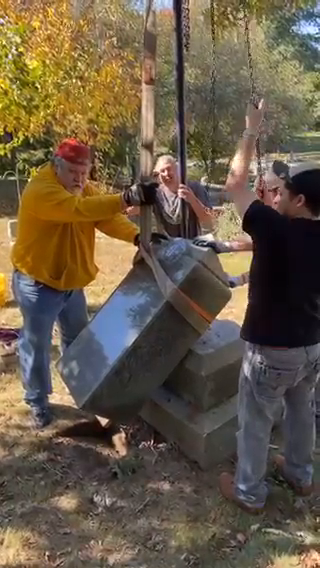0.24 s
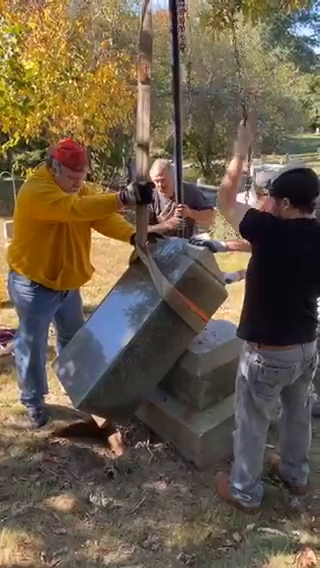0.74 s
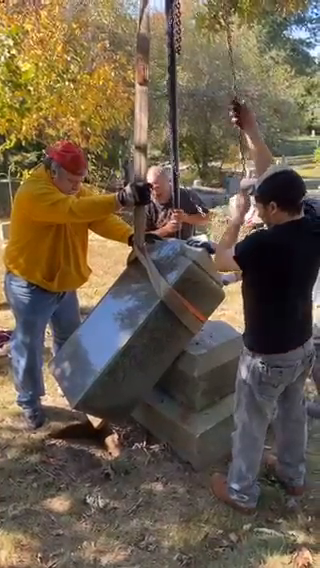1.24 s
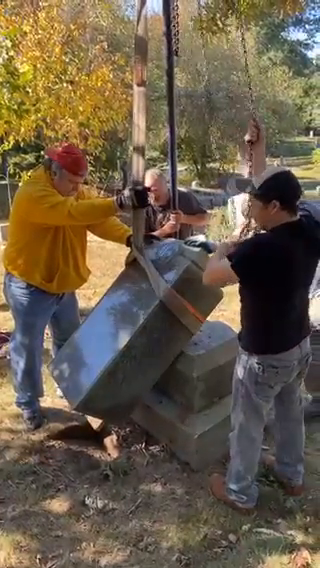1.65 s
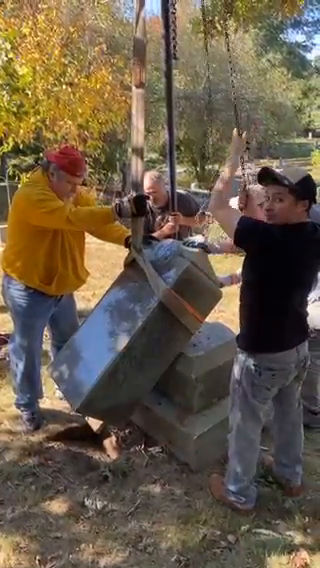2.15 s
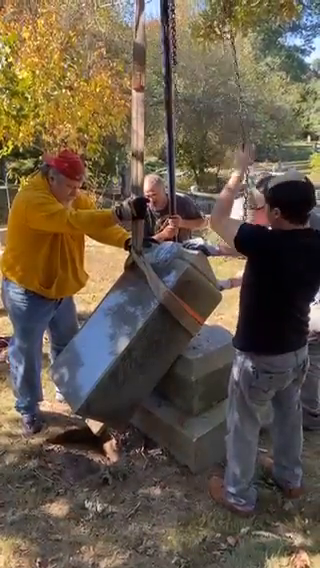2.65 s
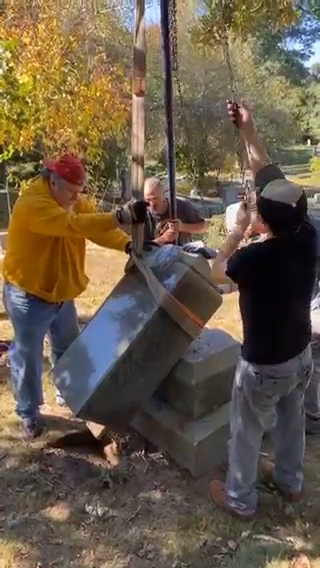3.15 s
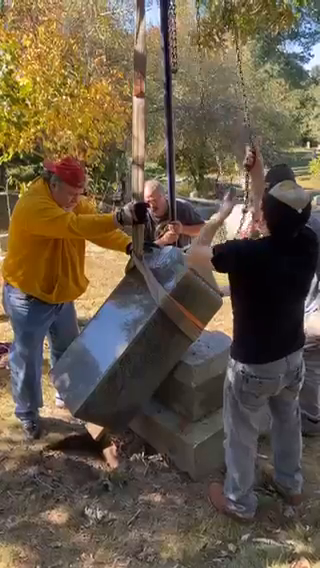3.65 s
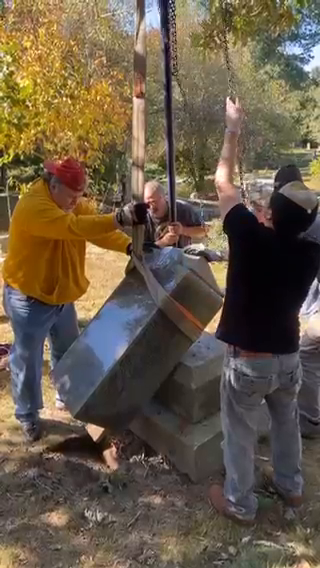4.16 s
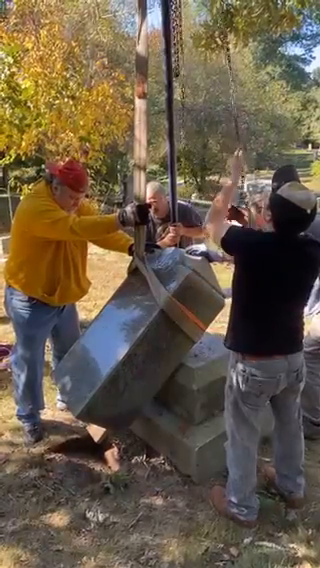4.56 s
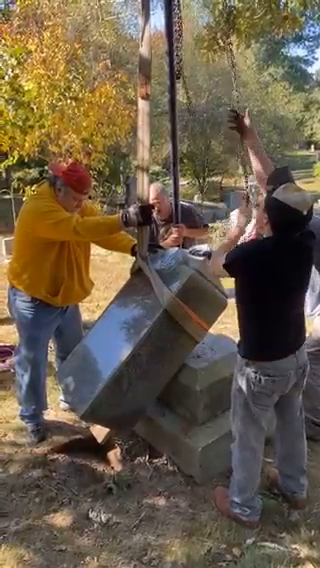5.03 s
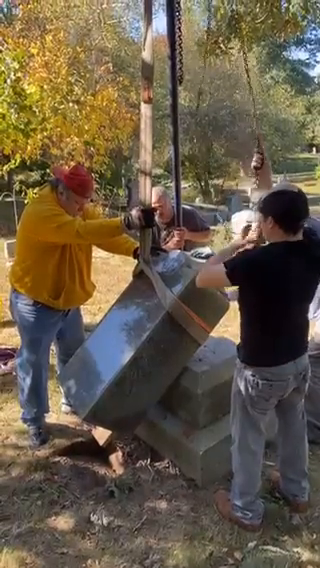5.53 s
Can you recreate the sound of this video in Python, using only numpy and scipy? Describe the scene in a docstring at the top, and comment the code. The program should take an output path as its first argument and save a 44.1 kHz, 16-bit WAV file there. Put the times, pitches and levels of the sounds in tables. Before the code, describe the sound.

Fast ratchet snaps and jangling steel chain run continuously close by in the open air, with a soft distant rumble underneath.

```python
"""A hand chain hoist lifts a stone outdoors, a few metres from a phone. The pawl snaps over the ratchet teeth,
chain links clank into the pockets of the hand wheel and ring, both shake the steel casing;
slack links rattle in between, over distant traffic rumble."""
import sys
import numpy as np
from scipy import signal
from scipy.fft import rfft, irfft
from scipy.io import wavfile
from scipy.ndimage import uniform_filter1d

SR = 44100
rng = np.random.default_rng(int(sys.argv[2]) if len(sys.argv) > 2 else 0)


def master_out(mix):
    """Clip the mix to full scale and print it as 16-bit PCM to the path in sys.argv[1]."""
    frames = np.transpose(np.atleast_2d(mix))
    ceiling = np.clip(frames, -1, 1)
    pcm = np.round(ceiling * 32767).astype(np.int16)
    wavfile.write(sys.argv[1], SR, pcm)


N = 255339

# pawl snaps, one a ratchet tooth: (s, peak dB, Hz)
PAWL = ([(.007, -12, 2700)] + [(0.177, -8.5, 2810), (0.2793, -12.5, 2630), (0.402, -10.5, 2640), (0.5003, -14, 2840),
                         (0.5876, -18.5, 2560), (0.6833, -9, 2770), (0.7711, -13.5, 2710), (0.847, -13.5, 2860),
                         (0.9203, -11, 2550), (1.0096, -12, 2730), (1.1338, -12, 2780), (1.2101, -15.5, 2640),
                         (1.2815, -10, 2800), (1.3603, -12, 2850), (1.4361, -10, 2840), (1.5145, -11.5, 2650),
                         (1.6132, -15.5, 2800)] + [(1.7497, -17, 2660)]
        + [(1.8632, -15.5, 2600), (1.9585, -10, 2800), (2.1076, -19.5, 2550), (2.2314, -11, 2600), (2.3122, -9.5, 2700),
           (2.3995, -8.5, 2770), (2.4953, -16.5, 2900), (2.6155, -21, 2580), (2.7367, -14.5, 2670), (2.8479, -13.5, 2670),
           (2.9687, -9, 2850), (3.045, -10, 2620), (3.1438, -16, 2640), (3.2535, -13, 2850), (3.3513, -10, 2720),
           (3.4371, -10, 2790), (3.5304, -13, 2770), (3.6132, -11.5, 2820), (3.6945, -10, 2720), (3.7803, -10.5, 2760),
           (3.8876, -12.5, 2840), (3.9784, -17, 2830), (4.0732, -9.5, 2670), (4.151, -9, 2610), (4.2273, -10, 2810),
           (4.3515, -18.5, 2560), (4.5177, -19, 2630), (4.5945, -9.5, 2720), (4.6688, -12, 2820), (4.7616, -19.5, 2620),
           (4.8664, -12.5, 2800), (4.9547, -9.5, 2800), (5.0275, -10, 2680), (5.1128, -13, 2760), (5.1991, -13, 2850),
           (5.2809, -14, 2840), (5.3662, -9.5, 2760), (5.454, -14.5, 2650), (5.5892, -11, 2740), (5.699, -11.5, 2600)])
# links ringing as they seat in the wheel: (s, peak dB, Hz, t60 s)
LINKS = [(.009, -14.5, 4110, 0.019)] + [(0.0767, -23, 4070, 0.03), (0.0992, -20.5, 4210, 0.041), (0.1501, -20, 4170, 0.02),
                         (0.1785, -12.5, 4130, 0.015), (0.2384, -16, 4240, 0.023), (0.2718, -19, 4320, 0.034),
                         (0.2798, -16, 4000, 0.021), (0.3232, -28, 4300, 0.027), (0.3601, -25, 4270, 0.022),
                         (0.3731, -21, 4200, 0.024), (0.4025, -23, 4400, 0.022), (0.403, -15, 4130, 0.024),
                         (0.4544, -19, 4280, 0.021), (0.4898, -22, 4650, 0.024), (0.5018, -18, 4120, 0.028),
                         (0.5252, -20, 4370, 0.032), (0.5601, -26, 3900, 0.024), (0.5601, -17, 4480, 0.018),
                         (0.5896, -20.5, 4040, 0.024), (0.6155, -17, 4230, 0.024), (0.6365, -18, 4300, 0.024),
                         (0.6684, -20, 4100, 0.024), (0.6848, -13, 4040, 0.018), (0.7068, -18, 4400, 0.033),
                         (0.7213, -17, 4300, 0.024), (0.7397, -18, 4100, 0.027), (0.7721, -17, 4020, 0.028),
                         (0.7946, -32, 4290, 0.024), (0.8026, -20, 4090, 0.033), (0.8305, -18, 4340, 0.027),
                         (0.848, -15.5, 4220, 0.044), (0.8849, -21, 4300, 0.024), (0.9218, -12.5, 4280, 0.027),
                         (0.9487, -18, 4180, 0.027), (0.9847, -22, 4350, 0.028), (0.9971, -15, 4240, 0.022),
                         (1.0111, -14.5, 4080, 0.022), (1.0291, -37, 4250, 0.021), (1.0505, -28, 4440, 0.022),
                         (1.0924, -22, 4350, 0.024), (1.1059, -16.5, 4270, 0.02), (1.1353, -15, 4120, 0.024),
                         (1.1538, -17, 4300, 0.021), (1.1822, -20, 4530, 0.021), (1.2116, -18, 3950, 0.027),
                         (1.2116, -15, 4070, 0.02), (1.267, -16, 4210, 0.024), (1.283, -12.5, 4010, 0.024),
                         (1.3044, -27, 4180, 0.024), (1.3354, -12, 4150, 0.029), (1.3588, -15.5, 4200, 0.052),
                         (1.3887, -9.5, 4140, 0.038), (1.4376, -11.5, 4000, 0.02), (1.4656, -19, 4100, 0.024),
                         (1.485, -5.5, 4230, 0.034), (1.516, -16, 4160, 0.024), (1.5574, -12, 4280, 0.035),
                         (1.5584, -12, 4370, 0.024), (1.6008, -23, 4300, 0.024), (1.6147, -15.5, 4090, 0.024),
                         (1.6501, -8, 4360, 0.015), (1.6746, -28, 4260, 0.024), (1.7325, -30, 4080, 0.024),
                         (1.733, -24, 4120, 0.024), (1.7514, -19, 4150, 0.016), (1.7828, -23, 4170, 0.024),
                         (1.8128, -19.5, 4410, 0.024), (1.8492, -17.5, 4120, 0.022), (1.8652, -19, 4300, 0.028),
                         (1.8876, -22, 4160, 0.022), (1.949, -16, 4250, 0.014), (1.9599, -13, 4110, 0.026),
                         (2.0178, -37, 4280, 0.024), (2.0288, -27.5, 4330, 0.042), (2.1081, -23, 4360, 0.032),
                         (2.1485, -30, 4020, 0.024), (2.162, -20, 4100, 0.033), (2.2049, -20, 4100, 0.024),
                         (2.2328, -10.5, 4100, 0.019), (2.2757, -17, 4240, 0.033), (2.3136, -12.5, 4040, 0.028),
                         (2.3441, -21, 4150, 0.024), (2.37, -13, 4170, 0.024), (2.376, -13, 4440, 0.02),
                         (2.4004, -12, 4250, 0.034), (2.4468, -18.5, 4140, 0.024), (2.4843, -16, 4230, 0.024),
                         (2.4972, -17.5, 4110, 0.02), (2.5252, -22, 4120, 0.024), (2.5501, -11.5, 4390, 0.033),
                         (2.6174, -18, 4070, 0.027), (2.6509, -22, 4370, 0.019), (2.6678, -16.5, 4240, 0.024),
                         (2.7038, -23, 4380, 0.029), (2.7127, -24, 4100, 0.026), (2.7322, -18.5, 4100, 0.032),
                         (2.806, -23, 4000, 0.024), (2.8494, -16.5, 4190, 0.028), (2.8769, -40, 4300, 0.024),
                         (2.8938, -18.5, 4130, 0.022), (2.9422, -18, 4200, 0.016), (2.9696, -11, 4080, 0.022),
                         (3.0126, -14, 4120, 0.022), (3.0465, -10.5, 4250, 0.024), (3.0724, -24, 4230, 0.029),
                         (3.0984, -18.5, 4170, 0.034), (3.1118, -19, 4370, 0.037), (3.1323, -40, 4040, 0.024),
                         (3.1453, -14, 4090, 0.028), (3.1592, -16, 4310, 0.027), (3.2041, -22, 4260, 0.024),
                         (3.24, -20, 4050, 0.04), (3.2844, -15.5, 4300, 0.024), (3.3209, -18, 4200, 0.021),
                         (3.3528, -21, 4050, 0.024), (3.3533, -14, 4310, 0.05), (3.4256, -14.5, 4240, 0.029),
                         (3.4386, -14, 4090, 0.03), (3.4965, -18, 4240, 0.024), (3.5349, -12, 4170, 0.03),
                         (3.5538, -30, 4370, 0.024), (3.5658, -15, 4100, 0.033), (3.5857, -11, 4130, 0.03),
                         (3.6147, -13.5, 4190, 0.046), (3.6691, -13.5, 4230, 0.032), (3.696, -14.5, 4120, 0.03),
                         (3.7344, -16, 4090, 0.037), (3.7579, -12, 4350, 0.02), (3.7818, -12, 4170, 0.021),
                         (3.8257, -31, 4150, 0.021), (3.8736, -22, 4370, 0.021), (3.8891, -15, 4160, 0.024),
                         (3.9145, -22.5, 4180, 0.03), (3.9454, -15, 4390, 0.035), (3.9799, -19, 4090, 0.032),
                         (4.0257, -24, 4280, 0.024), (4.0602, -15, 4350, 0.026), (4.0746, -10, 4130, 0.017),
                         (4.117, -12, 4320, 0.013), (4.1525, -12, 4070, 0.041), (4.2103, -9, 4180, 0.019),
                         (4.2283, -13.5, 4080, 0.031), (4.2642, -20, 4120, 0.024), (4.2956, -15, 4050, 0.017),
                         (4.3291, -20, 4200, 0.031), (4.3495, -16.5, 4200, 0.021), (4.3829, -27.5, 4020, 0.036),
                         (4.4204, -29, 3960, 0.027), (4.4204, -22, 4300, 0.024), (4.4458, -11, 4170, 0.019),
                         (4.4762, -36, 4200, 0.024), (4.4862, -22, 4230, 0.024), (4.5032, -24, 4060, 0.024),
                         (4.5286, -19.5, 4350, 0.07), (4.5531, -11.5, 4300, 0.011), (4.586, -15.5, 4180, 0.037),
                         (4.6154, -14.5, 4260, 0.02), (4.6468, -26, 4340, 0.024), (4.6698, -25, 3800, 0.024),
                         (4.6703, -18, 4160, 0.024), (4.7082, -29, 4300, 0.024), (4.7282, -27, 4160, 0.024),
                         (4.7461, -23, 4180, 0.024), (4.7895, -18.5, 4100, 0.029), (4.8279, -19.5, 4050, 0.02),
                         (4.8499, -38, 4250, 0.019), (4.8678, -13.5, 4060, 0.021), (4.9072, -26, 4020, 0.024),
                         (4.9072, -15, 4160, 0.024), (4.9312, -15, 4130, 0.026), (4.9561, -10, 4200, 0.027),
                         (4.9751, -14.5, 4160, 0.041), (4.997, -13, 4210, 0.03), (5.0285, -10, 4150, 0.024),
                         (5.0534, -18, 4150, 0.024), (5.0759, -12, 4180, 0.018), (5.1143, -16, 4220, 0.021),
                         (5.1507, -17, 4090, 0.024), (5.1572, -10.5, 4260, 0.028), (5.2006, -17, 4110, 0.024),
                         (5.2011, -18, 4270, 0.024), (5.2295, -21, 4330, 0.016), (5.24, -17, 4250, 0.03),
                         (5.252, -14.5, 4250, 0.072), (5.3188, -16, 4440, 0.024), (5.3208, -10, 4200, 0.045),
                         (5.3677, -12.5, 4180, 0.024), (5.3892, -21, 4100, 0.026), (5.4136, -17, 4080, 0.041),
                         (5.4565, -16.5, 4170, 0.024), (5.5064, -21.5, 4190, 0.028), (5.5493, -24, 4230, 0.031),
                         (5.5633, -18, 4150, 0.033), (5.5907, -15, 4060, 0.021), (5.6156, -24, 4280, 0.024),
                         (5.6431, -19, 4240, 0.027), (5.669, -10.5, 4180, 0.029), (5.6984, -13, 4210, 0.033),
                         (5.7404, -19.5, 4170, 0.037), (5.7638, -20, 4300, 0.028)]
# short hollow chirps: (s, peak dB, Hz)
CHIRPS = [(0.9702, -16, 2000), (0.9802, -11, 1820), (2.0443, -26.5, 2000), (2.173, -14.5, 1880), (5.678, -14.5, 1900),
          (5.688, -14, 1900)]
# dull bumps near the phone: (s, peak dB)
BUMPS = [(0.437, -43), (3.857, -37), (3.874, -39)]
# chain pull: (s, rattle dB)
PULL = [(0.0, -38.5), (0.09, -50), (0.37, -41.5), (0.66, -40), (1.5, -37.5), (1.95, -46), (2.14, -45), (2.35, -42),
        (2.63, -39.5), (2.74, -44), (3.42, -39.5), (4.14, -39.5), (4.27, -41), (4.47, -42), (4.58, -42), (5.22, -39),
        (5.64, -43.5), (5.79, -41.5)]
# casing modes: (Hz, dB, t60 s)
CASING = [(410, -20, 0.017), (514.6, -20.5, 0.16), (634, -17.5, 0.17), (770.4, -8.5, 0.16), (874, -2, 0.077), (915, -1.5, 0.05), (1053, -20, 0.28),
          (1167, -20.5, 0.17), (1330, -13.5, 0.12), (1434, -3, 0.063), (1571.5, -8.5, 0.073), (1836, -19, 0.27), (2073, 1.5, 0.016),
          (2131, 3.5, 0.021), (2485, 0.5, 0.025), (2864, 2, 0.031)]
# wheel guard modes: (Hz, dB, t60 s)
GUARD = [(3485, -2.5, 0.036), (3662, 1, 0.036), (3680, -5.5, 0.036), (3920, -5, 0.025)]
# upper modes of the steel: (Hz, dB, t60 s)
UPPER = [(4685, 3.5, 0.0067), (5490, -2, 0.0073), (5575, -0.5, 0.051), (6010, -14, 0.038), (7050, -26, 0.0067), (7050, -4, 0.019), (7230, -7.5, 0.013),
         (7300, -34, 0.019), (8180, -17, 0.042), (9550, -26, 0.062), (9310, -15, 0.057), (10150, -25, 0.054), (10600, -21, 0.09),
         (11490, -21, 0.056), (12600, -27, 0.022), (13800, -44, .015), (15200, -34, .01)]
# ring of slack links: (Hz, dB, t60 s)
SLACK = [(4000, 8, 0.016), (4160, 3, 0.067), (4114, 10, 0.062), (4360, 9, 0.032), (4420, 9.5, 0.061), (4900, -12, 0.06), (4290, -10.5, 0.13), (4940, -1, 0.027)]
TOP_HZ = 15900  # fixed
# chain knocking on the guard: (s, treble peak dB, casing against treble dB, guard against treble dB)
KNOCKS = [(.005, -18.5, -6.5, -0.5)] + [(0.0747, -22.5, -5.5, -9), (0.1511, -21.5, -5.5, -3), (0.177, -16.5, -2, -1), (0.1989, -21.5, -3, -8),
                         (0.2369, -21, -1, -3), (0.2788, -21, -4, 0), (0.3217, -21, -1.5, -12),
                         (0.3561, -30, 3, -15), (0.3711, -21, -8, -5), (0.4015, -16, -14, -1),
                         (0.4524, -23.5, -4, -8), (0.4883, -18.5, 1, 1), (0.5232, -20.5, 1.5, -10),
                         (0.5576, -20.5, -6, -7), (0.5906, -20, -1, -9), (0.5911, -23, 1, -9), (0.616, -19, -1, 3),
                         (0.6694, -22, -4, 2), (0.6833, -17.5, -5, -7), (0.7058, -20, -6, -8), (0.7387, -22, -14, -4),
                         (0.7711, -15.5, 2.5, -4), (0.8315, -22, -6, -5), (0.8465, -16.5, 2.5, -3),
                         (0.8859, -21, -1, -11), (0.9163, -14.5, 3.5, 1), (0.9443, -19, -4, -7),
                         (0.9677, -23, -6, -10), (0.9862, -21, -8, -7), (1.0096, -17.5, -4, -3),
                         (1.049, -25, 2, -17), (1.0904, -36, -1, -1), (1.0904, -23.5, -3, -7), (1.1338, -16, 2, 0),
                         (1.1523, -20, -3, -11), (1.1827, -21, -7, -10), (1.2101, -17, -3, -6), (1.281, -17, -5, 2),
                         (1.281, -21, -3, -5), (1.3029, -29, -6, -3), (1.3344, -20, -11, -6), (1.3568, -15, 3, -3),
                         (1.3892, -15, -2.5, -8), (1.4237, -32, -7, -11), (1.4361, -16.5, 4, -5), (1.4546, -26, -8, 0),
                         (1.48, -18.5, -1, 3), (1.514, -19, -2, -3), (1.5479, -21, 0, -3), (1.5863, -22.5, -11, -6),
                         (1.6127, -20.5, 1, 0), (1.6247, -24, 0, -5), (1.6496, -21.5, 3, -2), (1.6731, -29, -3, -2),
                         (1.731, -24, -7, -4), (1.7499, -26, -8, -2), (1.7818, -19, 0.5, -16), (1.8287, -21.5, -2, -6),
                         (1.8627, -21.5, 2, 4), (1.8856, -21, -0.5, -7), (1.9046, -25, -11, -2), (1.948, -21, 0, -3),
                         (1.9579, -17, 2.5, -1), (1.9834, -21, 0, -11), (2.0288, -21.5, -1, -13),
                         (2.1076, -19, -6, -6), (2.1475, -27.5, 2, -2), (2.2049, -21, -0.5, -2), (2.2308, -16, -2, 1),
                         (2.2638, -19.5, -5, -9), (2.2777, -24, -5, 0), (2.3116, -15, 2.5, -3), (2.3371, -20, -2, -11),
                         (2.3745, -21, 2, -1), (2.3989, -15.5, -4, -3), (2.4463, -20.5, -6, -1), (2.4823, -20.5, -2, -8),
                         (2.5247, -24, 3, 0), (2.5486, -18, -6, 2), (2.6189, -19.5, -0.5, -8), (2.6683, -21, -12, -8),
                         (2.7137, -20.5, -1, -7), (2.7362, -21.5, -4, -4), (2.7576, -18, -4, -5), (2.8065, -21, -2, 5),
                         (2.8479, -18, -20, 3), (2.8933, -23, -3, 3), (2.9497, -19.5, -5, -1), (2.9682, -15, -5, -1),
                         (3.0126, -18, -1, -5), (3.0445, -15, 0.5, 2), (3.0734, -19, -5, -6), (3.1138, -25, -15, -10),
                         (3.1433, -21, 2, -3), (3.1597, -24, -6, -5), (3.1802, -47, -3, -8), (3.2041, -21.5, -4, -5),
                         (3.2405, -18, -3, -8), (3.2829, -20.5, 2, -6), (3.3223, -23, -11, -4), (3.3508, -16, -1, -3),
                         (3.4251, -19, 4.5, 1), (3.4585, -19.5, -2, -5), (3.4974, -23, -12, -2), (3.5299, -18.5, 0, 2),
                         (3.5633, -22, 3, -5), (3.5972, -21, -8, -3), (3.6132, -15.5, 2, -2), (3.6606, -23, -3, -1),
                         (3.6945, -16.5, 4, 1), (3.7274, -22, -4, -8), (3.7584, -27, -3, -3), (3.7798, -16.5, -8, 0),
                         (3.8227, -23.5, -10, -6), (3.8776, -20, -2, -1), (3.9125, -22, 1.5, -4), (3.9509, -22, -14, -5),
                         (3.9784, -17, 1.5, -11), (4.0267, -22.5, -9, -12), (4.0607, -23, -1, -2), (4.0731, -17, -3, 1),
                         (4.1205, -20, -7, -3), (4.1505, -16, -3.5, -2), (4.1804, -22.5, -5, -4),
                         (4.2108, -23, -10, -2), (4.2268, -18, -3, -1), (4.2527, -20.5, 3, -6), (4.2857, -25, 1, -5),
                         (4.3286, -35, -1, -7), (4.3475, -23.5, 1, -1), (4.4218, -21.5, 0.5, -10), (4.4398, -30, 0, -7),
                         (4.4862, -24, -5, -5), (4.5271, -21.5, 8, 4), (4.5605, -21.5, 4, 2), (4.594, -16, 2, -4),
                         (4.6109, -18.5, 3, -10), (4.6453, -23.5, -1, -3), (4.6688, -19, 3, -1),
                         (4.7067, -22.5, -1, -7), (4.7461, -20, -3, -4), (4.788, -21.5, 0.5, -6), (4.8269, -21, -8, -1),
                         (4.8668, -19, -4, -4), (4.8948, -37, -3, -9), (4.9057, -27, -7, -5), (4.9392, -19, -1, -7),
                         (4.9546, -15.5, -11, 3), (4.997, -21, -3, -3), (5.027, -15.5, 0, 2), (5.0599, -30, -11, -6),
                         (5.0883, -25, -17, -3), (5.1123, -20, -5, -3), (5.1512, -20.5, -5, 3), (5.1936, -18, -2, -6),
                         (5.228, -22, -6, -2), (5.252, -17, -3, -2), (5.2809, -22, 4, 3), (5.2919, -21.5, 2, -1),
                         (5.3208, -19, 1, -4), (5.3537, -23, -3, 1), (5.3657, -17, -7, -6), (5.3867, -23, -3, -1),
                         (5.4121, -17, -4, -3), (5.4535, -21, -2, -4), (5.5044, -24.5, -2, -12),
                         (5.5488, -48, -3, -3), (5.5638, -22, -4, 0), (5.5887, -19.5, -7.5, -5), (5.6156, -26, 6, -2),
                         (5.6635, -17, -9, -10), (5.6755, -26, -3, -5), (5.6984, -15.5, 3.5, 5), (5.7289, -19.5, 1, 1),
                         (5.7643, -22.5, -1, -9)] + [
    (.428, -25, -7, -5), (.632, -23, -8, -5), (.797, -24, -8, -8), (1.125, -27, -6, -8), (1.243, -20, 0, -4), (1.27, -29, -4, -6),
    (2.161, -25, -1, -2), (2.57, -25, -10, -2), (3.39, -25, -4, -5), (3.419, -26, -2, -5), (3.872, -26, -4, -5), (4.384, -34, -3, -3),
    (4.505, -26, -6, -3), (4.587, -19, -2, 1)]
TOWN = [(20, -19), (35, -11), (55, 1.5), (73, 2.5), (100, -2), (150, -9), (250, -15.5), (400, -12), (600, -26), (1200, -48), (6000, -90)]  # (Hz, dB per Hz)
# pawl arm modes: (Hz, dB, t60 s)
ARM = [(1443, 0.5, 0.052), (1568, -1.5, 0.08)]
# traffic swells: (s, rumble dB)
SWELL = [(0.0, -54), (1.34, -53.5), (2.71, -56), (3.47, -56), (3.81, -53.5), (4.19, -56.5), (4.53, -53), (5.26, -56.5),
         (5.79, -54)]
BOOM_DB = -5.5  # boom of the casing, against the snap
RISE_S, RISE_AT_T60_S = 0.0006, 0.047  # longer rings also rise more slowly
SETTLE_DB_PER_S, SETTLE_AFTER_S = 114, 0.0067  # slack links calm down when no knock shakes them
# lulls as the chain hangs still between grips: (middle s, length s, depth dB)
LULLS = [(0.027, 0.03, 7), (0.12, 0.025, 3), (0.353, 0.04, 11), (0.653, 0.011, 12), (1.07, 0.054, 14), (1.711, 0.025, 15), (1.917, 0.016, -4),
         (2.079, 0.09, 8.5), (2.6, 0.018, 11), (2.786, .03, 8), (2.925, 0.036, 5), (3.22, 0.033, 11), (3.855, .04, 5),
         (4.318, 0.025, 17), (4.37, 0.042, 15), (5.536, 0.042, 10.5)]


def undb(db):
    """Decibels to gain."""
    return 10 ** (np.asarray(db) / 20)


def strike(times, db, modes, contact_s, scatter_db, wobble=0., size=256):
    """Blows into a set of modes; each lands elsewhere, so it weights the modes anew and scrapes for a moment.
    Loose parts make the pitch of each mode wobble by a share of itself."""
    out, at = np.zeros(N), np.clip((np.asarray(times) * SR).astype(int), 0, N - 1)
    chance = rng.standard_normal((len(at), len(modes)))
    drift = uniform_filter1d(np.cumsum(rng.standard_normal(N)), size=20) / np.sqrt(SR)
    t = np.arange(size) / SR
    share = 1 / np.sqrt(np.sum(undb(np.array(modes)[:, 1]) ** 2))
    for k, (hz, mode_db, t60) in enumerate(modes):
        scrape = np.exp(-t / contact_s) * rng.standard_normal((len(at), size))
        # unit drive at the mode's own pitch
        scrape /= np.abs(scrape @ np.exp(-2j * np.pi * hz * t))[:, None] + .5 * np.sqrt(contact_s * SR / 2)
        push = np.zeros(N + size)
        np.add.at(push, at[:, None] + np.arange(size), scrape * undb(db + scatter_db * chance[:, k])[:, None])
        pole = np.exp(2j * np.pi * hz / SR - np.log(1000) / (t60 * SR))
        ring = signal.lfilter([1], [1, -pole], push[:N])
        if wobble:
            ring = ring * np.exp(1j * np.sqrt(2 * np.pi * wobble * hz) * np.roll(drift, k * N // len(modes)))
        out += share * undb(mode_db) * ring.imag
    return out


def pings(times, db, hz, t60, rise_s, glide=0., partner=0., partner_hz=0.):
    """Tones with a soft rise and their own pitch and decay; a close partner mode makes them beat."""
    out, t = np.zeros(N + 2800), np.arange(2800) / SR
    chance = rng.random((len(times), 3))
    for s, d, f, ring, rise, a, b, c in np.broadcast(times, db, hz, t60, rise_s, *chance.T):
        shape = (1 - np.exp(-t / max(rise, 1e-4))) ** 2 * 1000. ** (-t / max(ring, .003))
        turn = 2 * np.pi * f * (t + glide * ring * np.exp(-5 * t / ring))
        tone = np.sin(turn + 2 * np.pi * a) + partner * np.sin(turn + 2 * np.pi * ((2 * b - 1) * partner_hz * t + c))
        out[int(s * SR):][:len(t)] += undb(d) * shape / shape.max() * tone
    return out[:N]


def pawl(touch_s=.003, bounce_s=.008):
    """A light touch, a hard dead snap that booms in the casing, then a bounce that rings the arm."""
    s, db, hz = np.transpose(PAWL)
    return (pings(s + 0.00035, db + 0.5, hz, 0.0044, rise_s=0.0008) + crack(s - touch_s, db - 17, decay_s=0.0016, hz=5000.)
            + strike(s, db + BOOM_DB, CASING, contact_s=0.0033, scatter_db=1.5, wobble=0.00404)
            + strike(s + bounce_s, db - 10.5, ARM, contact_s=0.0012, scatter_db=2.0, wobble=0.00796))


def links(rough=0.34):
    """Every link rings at its own pitch; rubbing its neighbours makes the ring flutter."""
    s, db, hz, t60 = np.transpose(LINKS)
    flutter = uniform_filter1d(uniform_filter1d(rng.standard_normal(N), size=50), size=50)
    return (pings(s, db, hz, t60, RISE_S * np.sqrt(np.abs(t60) / RISE_AT_T60_S), partner=0.13, partner_hz=330.0)
            * (1 + rough * flutter / np.std(flutter)))


def rattle(count=2600):
    """Slack links tick at random, as hard as the chain is pulled, settle after each knock and fall quiet in the lulls."""
    chance = rng.random((count, 2))
    s = chance[:, 0] * N / SR
    size_db = np.minimum(-3 * np.log(chance[:, 1]), 10)  # fixed
    shaken = np.sort(np.append(0, np.array(KNOCKS)[:, 0]))
    since_s = s - shaken[np.searchsorted(shaken, s, side="right") - 1]
    db = np.interp(s, *np.transpose(PULL)) + size_db - SETTLE_DB_PER_S * np.maximum(since_s - SETTLE_AFTER_S, 0)
    middle, length, depth_db = np.transpose(LULLS)[:, :, None]
    db = db - np.sum(depth_db * np.exp(-(2 * (s - middle) / length) ** 4), axis=0)  # fixed
    scatter_db = 4  # fixed
    return (strike(s, db + 4.5, SLACK, 0.00042, scatter_db, wobble=0.005975, size=48)
            + strike(s, db + 2.5, CASING, 0.00038, scatter_db, wobble=0.0125, size=48)
            + strike(s, db + 1.5, GUARD, 0.00019, scatter_db, size=48)
            + strike(s, db + 2.0, UPPER, 0.00093, scatter_db, wobble=0.015, size=48)
            + crack(s, db - 9.0, decay_s=0.0012, hz=6000.0))


def chirps():
    """Brief falling notes."""
    s, db, hz = np.transpose(CHIRPS)
    return pings(s, db, hz, 0.0082, rise_s=0.00028, glide=-0.048, partner=0.15, partner_hz=394.0)


def bumps():
    """Soft thuds."""
    s, db = np.transpose(BUMPS)
    return pings(s, db, 150.0, 0.024, rise_s=0.001, glide=-0.011, partner=0.94, partner_hz=121.0)


def town():
    """Low rumble that swells and ebbs, over a faint hiss."""
    hz = np.maximum(np.fft.rfftfreq(N, 1 / SR), 1)
    colour = undb(np.interp(np.log(hz), np.log(np.array(TOWN)[:, 0]), np.array(TOWN)[:, 1]))
    rumble = irfft(rfft(rng.standard_normal(N)) * colour, N)
    hiss = irfft(rfft(rng.standard_normal(N)) / (1 + (hz / 4000) ** 3), N)
    return rumble / np.std(rumble) * undb(np.interp(np.arange(N) / SR, *np.transpose(SWELL))) + undb(-57.5) * hiss


def yard(x, t60=0.12, wet_db=-13.0, far_t60=0.18, far_db=-21):
    """Nearby stones scatter a short tail, the trees a longer and fainter one."""
    t = np.arange(int(.4 * SR)) / SR
    near, far = (rng.standard_normal(len(t)) * 1000. ** (-t / ring) * (t > .004) for ring in (t60, far_t60))
    tail = undb(wet_db) * near / np.linalg.norm(near) + undb(far_db) * far / np.linalg.norm(far)
    return x + signal.fftconvolve(x, tail)[:N]


def crack(times, db, decay_s, hz):
    """A burst of bright noise at each contact."""
    t, out = np.arange(1500) / SR, np.zeros(N + 1500)
    np.add.at(out, (times * SR).astype(int), undb(db))
    burst = signal.fftconvolve(out, np.exp(-t / decay_s))[:N] * rng.standard_normal(N)
    return signal.sosfilt(signal.butter(2, [hz / 2, hz], "band", fs=SR, output="sos"), burst)


def knocks():
    """Steel on steel: a crack, the upper modes, and a jolt through guard and casing that depends on where it lands."""
    s, db, casing_db, guard_db = np.transpose(KNOCKS)
    return (strike(s, db + 4.0, UPPER, contact_s=0.0067, scatter_db=0.5, wobble=0.01563) + crack(s, db - 1.5, decay_s=0.0064, hz=5900.0)
            + strike(s, db + casing_db, CASING, contact_s=0.003, scatter_db=0.0, wobble=0.0039)
            + strike(s, db + guard_db, GUARD, contact_s=0.0031, scatter_db=3.0))


def radiate(x, low_hz=473.0, high_hz=8980.0, ground_hz=551.6):
    """The small hoist sends out no bass, its echo off the ground cancels one low band, the air dulls the top."""
    x = signal.sosfilt(signal.butter(4, low_hz, "high", fs=SR, output="sos"), x)
    x = signal.lfilter(*signal.iirnotch(ground_hz, 4.5, fs=SR), x)
    return signal.sosfilt(signal.butter(2, high_hz, fs=SR, output="sos"), x)


def scene():
    """Hoist in the open, plus surroundings."""
    hoist = radiate(pawl() + links() + knocks() + rattle() + chirps())
    return (yard(hoist) + bumps() + town())[None]


def record(dry):
    """The phone cuts the top."""
    return signal.sosfilt(signal.ellip(10, .2, 70, TOP_HZ, fs=SR, output="sos"), dry)


dry = scene()
out = record(dry)
master_out(out)
```